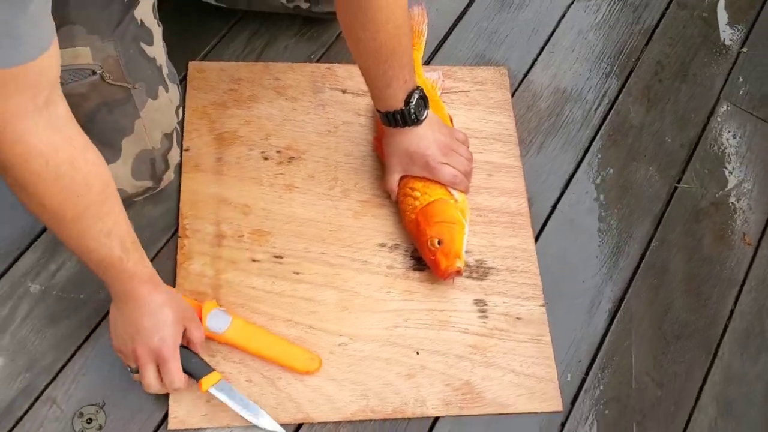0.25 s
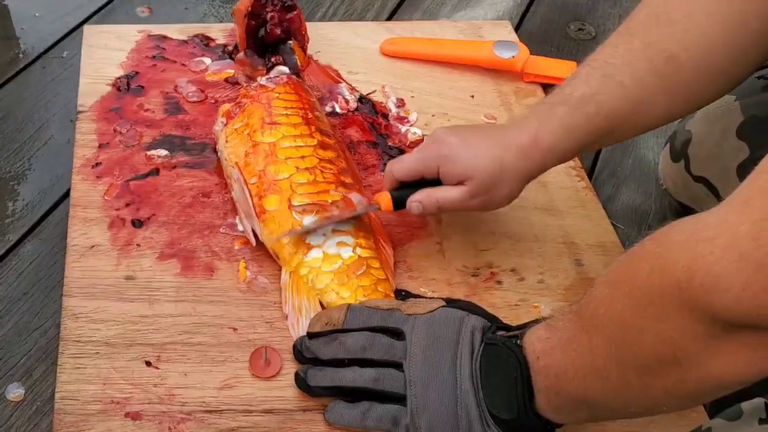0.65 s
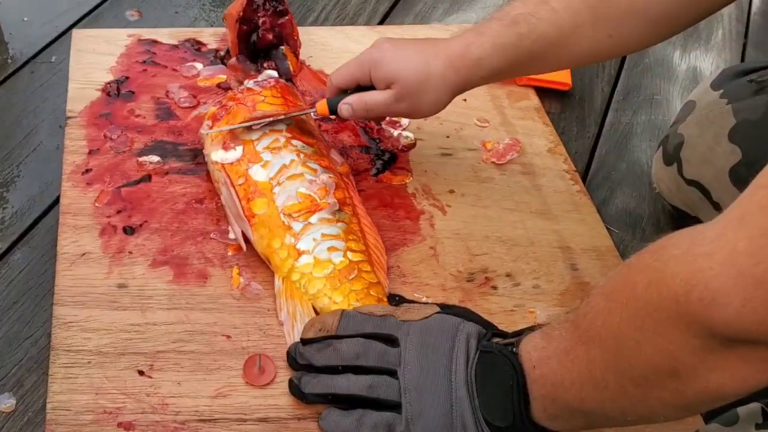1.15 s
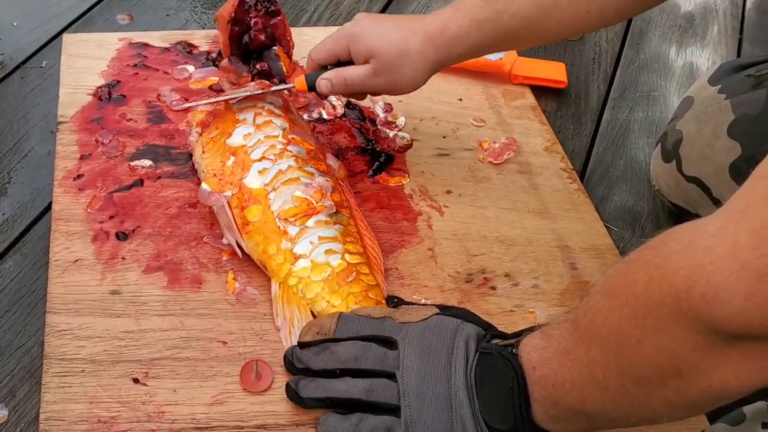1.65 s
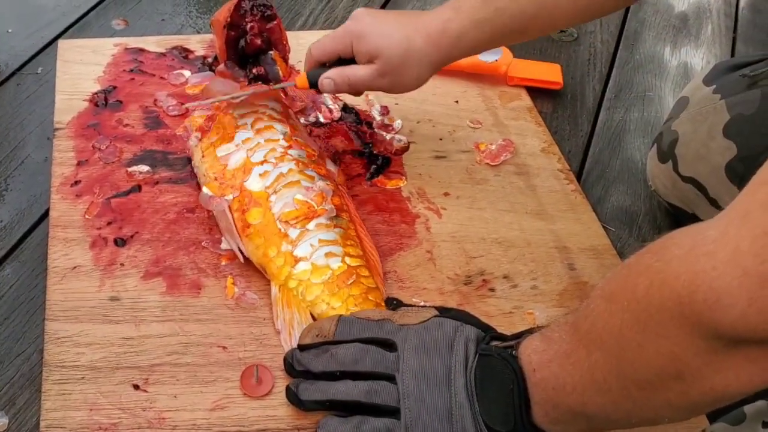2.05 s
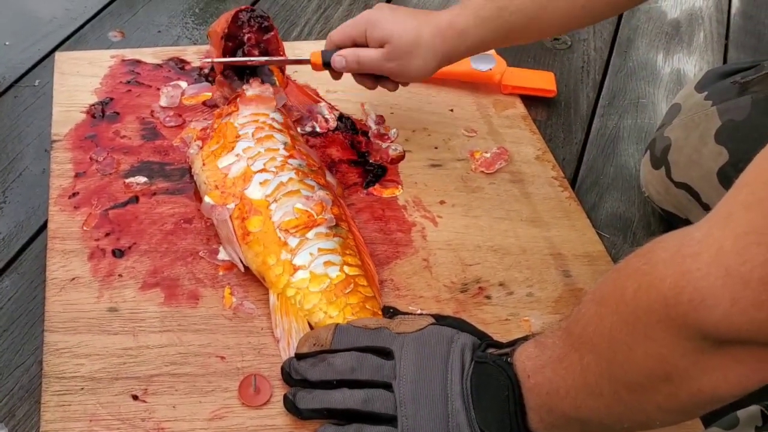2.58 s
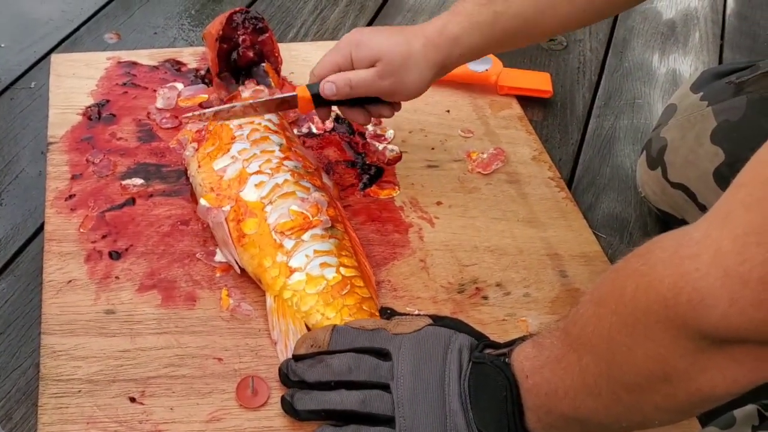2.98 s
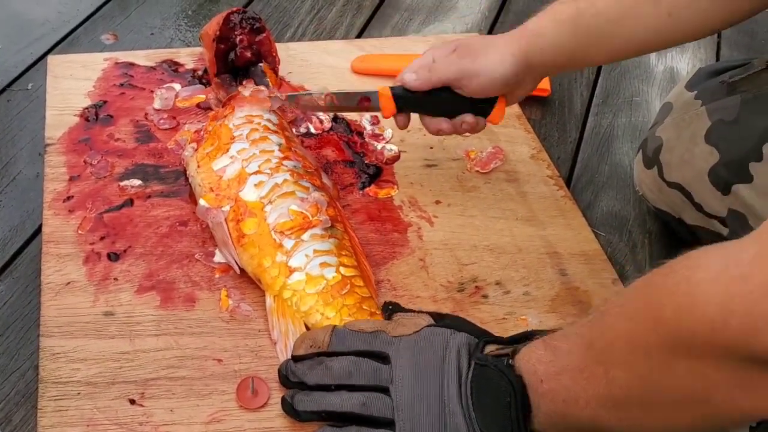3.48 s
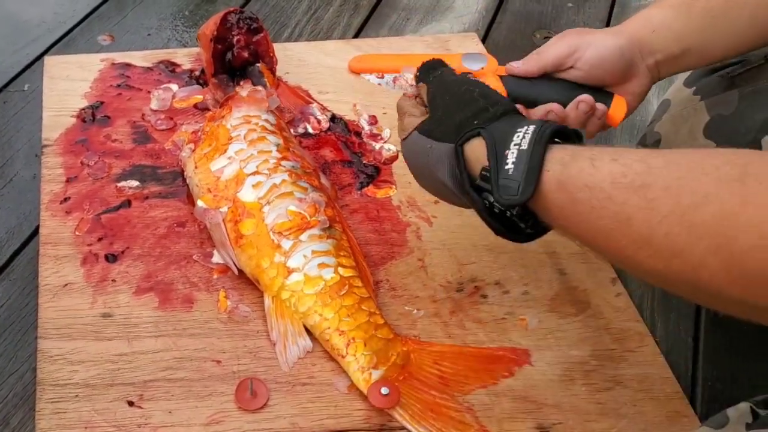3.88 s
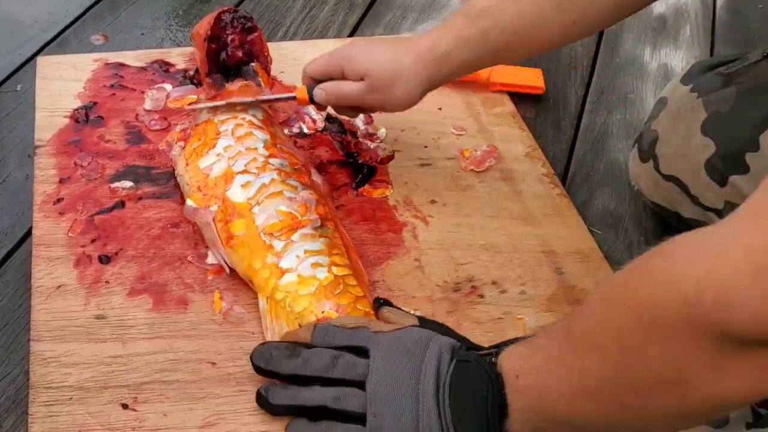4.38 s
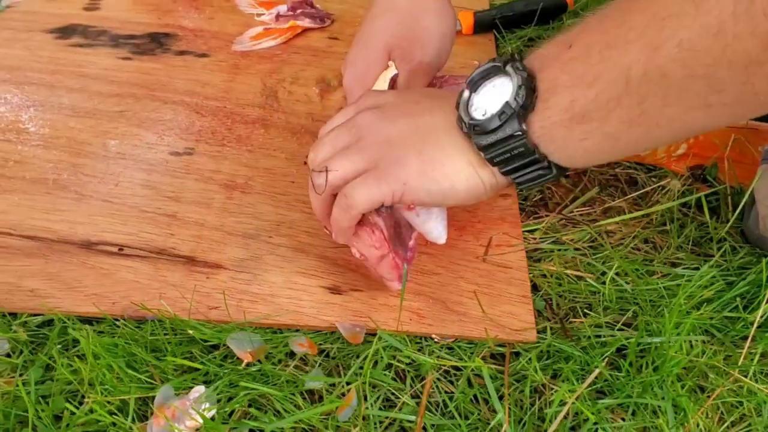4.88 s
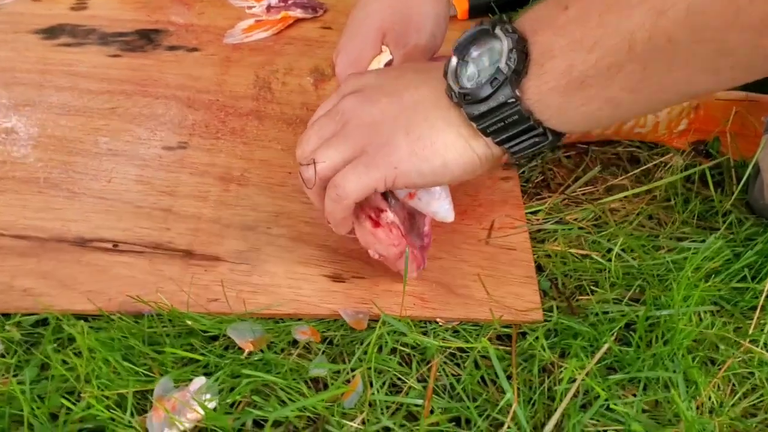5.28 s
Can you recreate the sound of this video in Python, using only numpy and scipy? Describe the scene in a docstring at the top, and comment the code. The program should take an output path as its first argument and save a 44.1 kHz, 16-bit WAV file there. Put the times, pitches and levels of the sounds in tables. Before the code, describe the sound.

Outdoors, a knife rasps scales off a fish in quick crunchy strokes with sharp snaps and board thuds, while small birds chirp.

```python
"""Outdoors on a wooden deck, someone scales a carp on a board while small birds chirp in the trees.
After a shuffle come quick knife strokes: showers of tiny clicks rasp and crunch, low noise thuds in the board,
and single scales snap off as a crack followed by a short ring. The birds are fast, echoing tone sweeps.
After a short break the scene is a quiet lawn, made of soft noise, where a hand rubs over the wet fish."""
import sys
import numpy as np
from scipy import signal
from scipy.fft import rfft, irfft
from scipy.io import wavfile
from scipy.ndimage import uniform_filter1d

SR = 44100
rng = np.random.default_rng(int(sys.argv[2]) if len(sys.argv) > 2 else 0)


def master(y):
    """Save y as 16-bit WAV."""
    cut = np.clip(np.atleast_2d(y).T, -1, 1)
    pcm = np.round(cut * 32767)  # scale
    wavfile.write(sys.argv[1], SR, pcm.astype(np.int16))


N = 244168
TIME = np.arange(N) / SR
BREAK_START, BREAK_END = 4.478, 4.509  # silence between deck and lawn, s
CHANNEL_LAG = 4  # clicks and cracks reach the right channel this many samples later


def undb(db):
    """Turn decibels into a gain."""
    return 10 ** (np.asarray(db) / 20)


def unit(x):
    """Scale a sound to an average (rms) strength of 1."""
    return x / np.sqrt(np.mean(x ** 2) + 1e-20)


def curve(rows):
    """Gain over time from (t/s, level/dB) rows, practically silent outside them."""
    s, db = np.transpose(rows)
    return undb(np.interp(TIME, s, db, left=-140, right=-140))


def response(points):
    """Gain at every frequency from (f/Hz, level/dB) points."""
    hz, db = np.transpose(points)
    f = np.maximum(np.fft.rfftfreq(N, 1 / SR), 1)
    return undb(np.interp(np.log(f), np.log(hz), db))


def colour(x, points):
    """Shape a sound's spectrum by (f/Hz, level/dB) points and scale it to rms 1."""
    return unit(irfft(rfft(x) * response(points), N))


def band(x, hz, width):
    """One resonance: frequencies near hz pass, the others are weakened."""
    hz = min(hz, .42 * SR)
    b, a = signal.iirpeak(hz, hz / min(width, SR / 4), fs=SR)
    return signal.lfilter(b, a, x)


def walk(rate):
    """Smooth random wander through `rate` new points per second, spread near 1."""
    points = rng.standard_normal(8192)
    return np.interp(TIME * rate, np.arange(len(points)), points)


def grains(per_s, spread_db, scatter=2.4):
    """Many tiny clicks of unequal size; the lag between the channels scatters (in samples)."""
    per_channel = rng.standard_normal((3, N))
    at = np.flatnonzero(rng.random(N) < per_s / SR)
    sign = rng.choice([-1, 1], N)
    size = sign * undb(spread_db * np.minimum(rng.exponential(size=N), 4))
    left, right = size * undb(2 * per_channel[:2])
    lag = CHANNEL_LAG + scatter * per_channel[2, at]
    later = np.round(at + lag).astype(int) % N
    return np.array([np.bincount(at, left[at], N), np.bincount(later, right[at], N)])


def swell(s, rise, fall, shape=1.24):
    """Pressure that peaks at time s; it is a tenth one rise before and one fall after."""
    span = np.abs(TIME - s) < 5 * max(rise, fall)
    from_peak = TIME[span] - s
    out = np.zeros(N)
    out[span] = 10 ** -(np.abs(from_peak / np.where(from_peak < 0, rise, fall)) ** shape)
    return out


def moves(rows):
    """Gain over time of overlapping rubbing moves, from (t/s, rise/s, fall/s, level/dB) rows."""
    return np.sqrt(sum((undb(db) * swell(s, rise, fall)) ** 2 for s, rise, fall, db in rows))


def burst(x, env, db):
    """A stretch of x under an envelope, with level db at its crest."""
    return unit(x * env) * undb(db) * np.sqrt(np.mean(env ** 2))


def add(out, s, x):
    """Mix x in at time s."""
    i = max(int(s * SR), 0)
    out[i:i + len(x)] += x[:N - i]


def diffuse(points, alike_hz=600):
    """Noise from all around: nearly the same in both channels in the bass, unrelated high up."""
    f = np.fft.rfftfreq(N, 1 / SR)
    alike = .97 / (1 + (f / alike_hz) ** 2)
    mid, side = rfft(rng.standard_normal((2, N))) * np.sqrt([1 + alike, 1 - alike])
    return colour(irfft(np.array([mid + side, mid - side]), N), points)


def outdoors():
    """Noise makes low rumble and leaf hiss over the deck, then a quieter lawn with a faint grasshopper."""
    # spectrum of the air over the deck: f/Hz, level/dB
    deck_air = [(18, -26.5), (28, -8), (42, 4), (65, -2.5), (130, -12.5), (220, -12), (400, -24.5),
                (800, -29.5), (1400, -36), (2600, -30), (4800, -33.5), (7300, -37.5), (16000, -41.5)]
    # spectrum of the air over the lawn: f/Hz, level/dB
    lawn_air = [(20, -23.5), (50, -2), (85, 6.5), (160, -8.5), (300, -16), (600, -23), (1000, -28),
                (2000, -30), (3000, -24.5), (4000, -28.5), (4700, -20.5), (5700, -37.5), (16000, -37)]
    # fine treble hiss of leaves over the deck: t/s, level/dB
    leaf_hiss = [(0, -58), (.6, -53.5), (1.3, -53.5), (1.8, -59.5), (2.6, -63.5)]
    # breeze over the lawn: t/s, level/dB
    breeze = [(4.5, -54.5), (4.7, -54.5), (4.82, -63.5), (4.95, -59), (5.2, -55), (5.56, -55.5)]
    # grasshopper: t/s, level/dB
    grasshopper = [(5.1, -76), (5.28, -71), (5.56, -61)]
    deck_db = -47.5  # the level wanders around this
    deck = diffuse(deck_air) * undb(deck_db + .8 * walk(4.3))
    hiss = diffuse([(1500, -6.5), (4000, -3.0), (9000, -0.5), (16000, 3.5)]) * curve(leaf_hiss)
    lawn = diffuse(lawn_air) * curve(breeze) * undb(0.7 * walk(8.1))
    wings = unit(band(band(rng.standard_normal((2, N)), 11300, 2200), 14500, 2500))
    return np.where(TIME < BREAK_END, deck + hiss, lawn + wings * curve(grasshopper))


def birds():
    """Birds sing gliding tones whose pitch trills fast, blurred by echoes among the trees."""
    # bird calls, two glides with a turn between: t/s, first glide/s, second glide/s,
    # start f/Hz, turn f/Hz, end f/Hz, trill depth/Hz, level/dB
    calls = [(0.875, 0.041, 0.08, 6060, 4280, 2750, 500, -45.5),
             (.995, 0.026, 0.017, 3600, 4450, 4500, 250, -46),
             (1.488, 0.093, 0.077, 2700, 4460, 2730, 535, -44),
             (2.12, 0.027, 0.033, 5300, 4770, 4180, 460, -46),
             (2.189, 0.071, .036, 3555, 2670, 3850, 342, -44),
             (2.726, 0.046, 0.049, 5400, 3670, 2625, 454, -45),
             (3.278, 0.09, 0.04, 2987, 4720, 3990, 520, -47),
             (3.394, 0.053, 0.057, 3330, 2585, 3220, 385, -49.5),
             (4.008, 0.051, 0.04, 5840, 4810, 3910, 706, -48),
             (4.094, 0.055, 0.11, 3300, 2540, 4070, 374, -48),
             (4.476, .036, 0.0337, 4310, 3047, 3700, 740, -44),
             (5.031, 0.072, 0.08, 4500, 4580, 4610, 115, -63),
             (5.417, 0.018, 0.018, 4400, 4250, 4280, 150, -43.5),
             (5.448, 0.038, 0.031, 4870, 4006, 3090, 620, -39.5)]
    trill_per_s, fade_s = 130, 0.01
    song = np.zeros(N)
    trill_rate = trill_per_s * (1 + .2 * walk(60))
    trill = np.sin(2 * np.pi * np.cumsum(trill_rate) / SR) + 0.21 * walk(700)
    for s, first, second, start_hz, turn_hz, end_hz, depth_hz, db in calls:
        length = first + second
        n, i = int(length * SR), int(s * SR)
        corners = np.log([start_hz, turn_hz, end_hz])
        glide = np.exp(np.interp(TIME[:n], [0, first, length], corners))
        hz = glide + depth_hz * trill.take(np.arange(i, i + n), mode="wrap")
        fade = signal.windows.tukey(n, 2 * fade_s / length)
        add(song, s, undb(db) * fade * np.sin(2 * np.pi * np.cumsum(hz) / SR))
    song = song * undb(1.9 * walk(70))
    # echoes: random noise dying away, different in each channel
    t = TIME[:SR]
    near_t60, far_t60 = .27, 1.3  # time to fade by 60 dB, s
    fading = undb(-60 * t / near_t60) + undb(-19 - 60 * t / far_t60)
    trees = rng.standard_normal((2, SR)) * fading
    return np.array([signal.fftconvolve(song, echo / np.linalg.norm(echo))[:N] for echo in trees])


def handling():
    """Rubbing and squishing are dense tiny clicks; the palm on wet skin is noise, mostly on the right."""
    # the knee shifts on the deck: t/s, rise/s, fall/s, drag level/dB, clothes rustle level/dB
    shuffle = [(.05, 0.15, 0.079, -68, -46), (.106, 0.033, 0.12, -32.5, -39.5),
               (0.171, 0.047, 0.076, -37, -35.5), (.21, .05, 0.39, -39, -39),
               (0.43, 0.024, 0.019, -33, -36.5), (.44, 0.24, 0.24, -44, -40)]
    # soft handling of fish and knife: t/s, length/s, level/dB
    squishes = [(1.524, 0.0091, -45), (4.292, 0.026, -43), (5.113, 0.0032, -56), (5.145, 0.006, -46.5),
                (5.162, 0.0039, -48)]
    # the hand slides on wet skin: t/s, rise/s, fall/s, level/dB
    rub = [(4.655, 0.048, 0.048, -36), (4.697, 0.03, 0.013, -35), (4.94, 0.062, 0.091, -63)]
    # resonances of the deck planks: f/Hz, width/Hz, level/dB
    planks = [(446, 97, -2), (1252, 36, -4)]
    # spectrum of the drag over the deck: f/Hz, level/dB
    drag_colour = [(120, 9), (230, 6), (400, -8), (560, 0.5), (800, -1.5), (1200, -6), (2000, -44.5)]
    # spectrum of the clothes: f/Hz, level/dB
    cloth_colour = [(500, 6.5), (1000, 5), (1900, 0.5), (4000, -2.5), (5500, -11.5), (7500, -16.5),
                    (16000, -33)]
    # spectrum of the squishing fish: f/Hz, level/dB
    squish_colour = [(150, -2.5), (450, -2), (950, -3), (1500, -4), (2400, -10.5), (5000, -17),
                     (15000, -18.5)]
    # spectrum of the hand on skin: f/Hz, level/dB
    skin_colour = [(120, -44), (200, -7), (294, -3), (529, -9), (1300, -9.5), (1940, -6), (5130, -5.5),
                   (7410, -1.5), (15100, -6.5), (16000, -24)]
    s, rise, fall, drag_db, rustle_db = np.transpose(shuffle)

    grit = colour(grains(per_s=3000, spread_db=4.5, scatter=10.7), drag_colour)
    rings = unit(sum(undb(db) * band(grit, hz, width) for hz, width, db in planks))
    drag = unit(grit + undb(-0.5) * rings)
    drag = drag * moves(zip(s, rise, fall, drag_db)) * undb(0.7 * walk(42.2))

    cloth = colour(grains(per_s=5100, spread_db=1.0, scatter=11), cloth_colour)
    cloth = cloth * moves(zip(s, rise, fall, rustle_db)) * undb(0.4 * walk(62))

    wet = colour(grains(per_s=4100, spread_db=2.5, scatter=13), squish_colour)
    squish = sum(burst(wet, swell(s, length, 1.07 * length), db) for s, length, db in squishes)

    left_db = -25  # palm in the left channel against the right
    palm = colour(rng.standard_normal((2, N)), skin_colour) * moves(rub)
    return drag + cloth + squish + palm * np.array([[undb(left_db)], [1]])


def snaps():
    """A scale tears loose with a crack, then flutters at its own pitch, differently in each channel."""
    # scales snapping off, and the faint ticks of the blade landing at the start of a stroke: t/s, level/dB,
    # ring f/Hz, time to fade by 60 dB/s
    cracks = [(0.5992, -26, 12800, .003), (.7425, -32, 13000, .007), (.851, -41, 12100, 0.0082),
              (0.893, -28, 9700, 0.01), (1.007, -34.5, 6760, 0.016), (1.1343, -18, 11400, .016),
              (1.2456, -43, 11000, .007), (1.2666, -23.5, 10100, 0.014), (1.268, -21.5, 4700, 0.061),
              (1.3, -29.5, 5330, 0.059), (1.307, -31, 5800, 0.057), (1.338, -39, 11900, 0.022),
              (1.4563, -37, 9300, 0.0094), (1.479, -30.5, 6530, 0.029), (1.6164, -24, 1610, 0.024),
              (1.6178, -27.5, 3920, 0.0059), (1.8464, -22.5, 8100, .014), (1.8721, -14, 6200, .018),
              (1.969, -45, 8800, .008), (1.9896, -25.5, 10600, 0.024), (2.1058, -39, 12100, 0.011),
              (2.14, -28.5, 3920, 0.013), (2.2873, -20.5, 5300, 0.0066), (2.2899, -17.5, 3660, 0.016),
              (2.9207, -39.5, 2030, 0.0053), (3.238, -38.5, 1500, 0.014), (3.27, -45.5, 9850, 0.022),
              (4.385, -30, 7780, .012), (4.398, -16.5, 11200, .016)]
    crack_hz, crack_s = 8990, 0.00058  # the crack's pitch lies between this and the ring's; its decay
    flutter_rise_s, flutter_db = 0.0033, -0.5  # the ring builds up after the crack; level against it
    loud_s = 0.0022  # the table's level is that of the whole snap squeezed into this time
    pan_db = 1.0  # left against right
    t, out = TIME[:2048], np.zeros((2, N))
    noises = rng.standard_normal((len(cracks), 3, len(t)))
    for (s, db, hz, t60), noise in zip(cracks, noises):
        tear_hz = np.sqrt(hz * crack_hz)
        crack = band(noise[2] * t * np.exp(-t / crack_s), tear_hz, 0.34 * tear_hz)
        crack = np.array([crack, np.roll(crack, CHANNEL_LAG)])
        width = 0.47 * hz
        ring = band(band(noise[:2], hz, width), hz, width)
        flutter = ring * undb(-60 * t / t60) * (1 - np.exp(-t / flutter_rise_s))
        snap = unit(unit(crack) + undb(flutter_db) * unit(flutter))
        snap = snap * undb(db) * np.sqrt(loud_s * SR / len(t))
        add(out[0], s, undb(pan_db / 2) * snap[0])
        add(out[1], s, undb(-pan_db / 2) * snap[1])
    return out


def knife():
    """Each stroke lands, rakes the scale edges, tears their roots, squeezes wet flesh and rocks the board."""
    # knife strokes: blade lands t/s, rise/s, fall/s, rasp on the scales level/dB,
    # bite into the flesh level/dB, thud of the board level/dB
    strokes = [(.576, 0.027, 0.049, -35, -48.5, -41.5), (0.709, 0.027, 0.042, -41.5, -45, -37),
               (0.8534, 0.041, 0.038, -34, -46, -47.5), (0.991, 0.03, 0.026, -35.5, -45, -40),
               (1.125, 0.011, 0.05, -35.5, -45.5, -51), (1.2465, 0.023, 0.021, -27, -45, -36),
               (1.359, 0.023, 0.051, -36, -48, -40.5), (1.456, 0.036, .025, -35.5, -49, -36),
               (1.572, 0.032, 0.064, -47.5, -43, -37), (1.708, 0.02, 0.017, -47, -52.5, -37),
               (1.8473, 0.026, 0.014, -32, -34.5, -30.5), (1.969, 0.026, 0.031, -34.5, -41, -32.5),
               (2.1036, 0.038, 0.02, -34.5, -41, -36), (2.246, 0.038, 0.038, -40, -43.5, -40.5),
               (2.54, 0.019, 0.023, -42, -47.5, -36), (2.715, 0.023, 0.028, -41, -48.5, -31),
               (2.885, .029, 0.028, -43, -44.5, -36), (3.049, 0.024, 0.035, -41.5, -45.5, -35.5),
               (3.214, 0.018, 0.03, -42, -47.5, -33), (4.375, .021, 0.041, -31, -43.5, -31.5)]
    # the board is bumped: t/s, length/s, level/dB
    bumps = [(0.035, 0.1, -37.5), (0.088, 0.032, -41)]
    # spectrum of the blade on scale edges: f/Hz, level/dB
    rasp_colour = [(2500, -40), (5000, -17.5), (6500, -8.5), (8500, 0), (11500, 0), (14000, 1), (16000, -8)]
    # spectrum of tearing roots: f/Hz, level/dB
    crunch_colour = [(1000, -29), (1900, -10), (2800, 3.5), (4200, -1), (6000, 0.5), (8000, -3.5),
                     (14000, -32.5)]
    # spectrum of the wet flesh: f/Hz, level/dB
    flesh_colour = [(120, 0), (210, 2.5), (370, 1.5), (550, -3.5), (1000, -8.5), (1600, -8.5), (2600, -19),
                    (5000, -39)]
    # spectrum of the board: f/Hz, level/dB
    thud_colour = [(15, -47), (30, -22), (50, -11), (85, 1.5), (115, -1), (150, -15), (220, -19.5),
                   (400, -35.5), (900, -60.5)]
    landing_s = 0.018  # time the blade takes to settle on the skin
    run_up = 1.3  # the push starts this many rise times before its crest: the blade lands pressing
    crunch_db = 0.8  # tearing roots, over the mean of rasp and bite
    thud_lead_s = 0.0034  # the board gives just before the blade is through
    # small scales flick off: rate, level against the rasp, span against the stroke
    flicks_per_s, flick_db, flick_spread = 80, -7, 0.68

    # the blade catches and slips from row to row: every slip frees a brief shower of clicks
    slips = (rng.random(N) < 210 / SR) * np.minimum(rng.exponential(size=N), 2)
    catch = 1 + signal.lfilter([1], [1, -np.exp(-1 / (.0014 * SR))], slips)
    edges = colour(grains(per_s=7000, spread_db=2.6, scatter=1.2), rasp_colour) * catch
    roots = colour(grains(per_s=2900, spread_db=-2.0, scatter=1.7), crunch_colour) * catch
    wet = colour(grains(per_s=2200, spread_db=4.5, scatter=9.8), flesh_colour)
    board = colour(rng.standard_normal(N), thud_colour)
    # each flick is a very short puff of noise
    t = TIME[:512]
    flick = rng.standard_normal((1, len(t))) * t * np.exp(-t / 0.00073)
    flicks = signal.fftconvolve(grains(flicks_per_s, spread_db=8.5), flick)[:, :N]
    flicks = colour(flicks, rasp_colour)

    out = np.zeros((2, N))
    for s, rise, fall, rasp_db, bite_db, thud_db in strokes:
        crest = s + rise
        landed = np.clip((TIME - s) / landing_s + 1, 0, 1)
        pressure = landed * swell(crest, run_up * rise, fall)
        out += burst(edges, pressure, rasp_db)
        out += flicks * pressure ** (1 / flick_spread) * undb(rasp_db + flick_db)
        out += burst(roots, pressure, (rasp_db + bite_db) / 2 + crunch_db)
        out += burst(wet, pressure, bite_db)
        rocking = swell(crest - thud_lead_s, rise=0.03, fall=0.035, shape=2.17)
        out += burst(board, rocking, thud_db)
    for s, length, db in bumps:
        out += burst(board, swell(s, length, length), db)
    return out


def scene():
    """All sources together, in a left and a right channel."""
    return outdoors() + birds() + handling() + snaps() + knife()


def record(dry):
    """Each channel gets its own colour; sound drops out between the two places, and the top is cut."""
    # colour difference of the channels: f/Hz, left minus right level/dB
    balance = [(70, 0), (300, -2), (600, -2.5), (1300, -5), (2500, -3), (5000, -3), (8500, 0.5),
               (15000, 0.5)]
    top_hz = 16100
    tilt = np.sqrt(response(balance))  # half the difference goes to each channel
    heard = irfft(rfft(dry) * np.array([tilt, 1 / tilt]), N)
    sounding = (TIME < BREAK_START) | (TIME > BREAK_END)
    running = uniform_filter1d(1. * sounding, size=64)  # softens the edges of the break
    top_cut = signal.ellip(10, .2, 70, top_hz, fs=SR, output="sos")
    return signal.sosfilt(top_cut, heard * running)


dry = scene()
out = record(dry)
master(out)
```